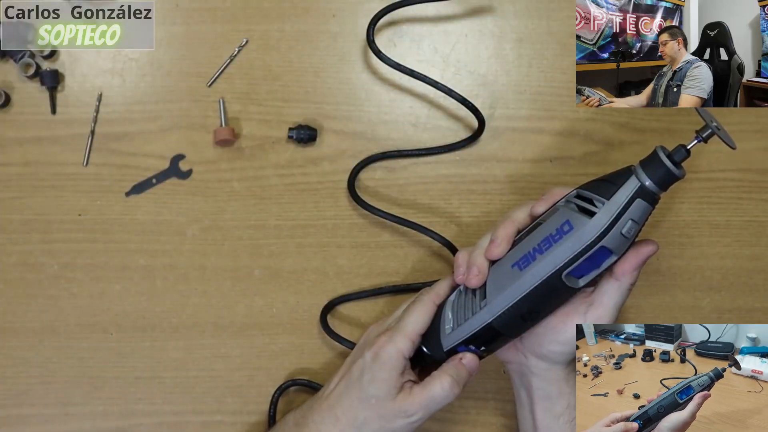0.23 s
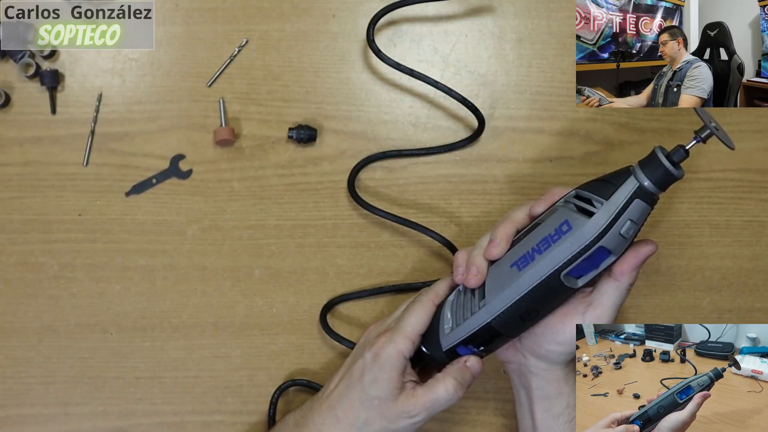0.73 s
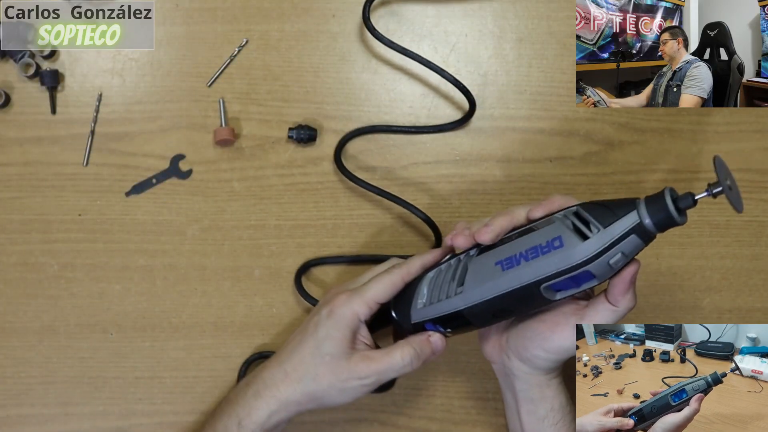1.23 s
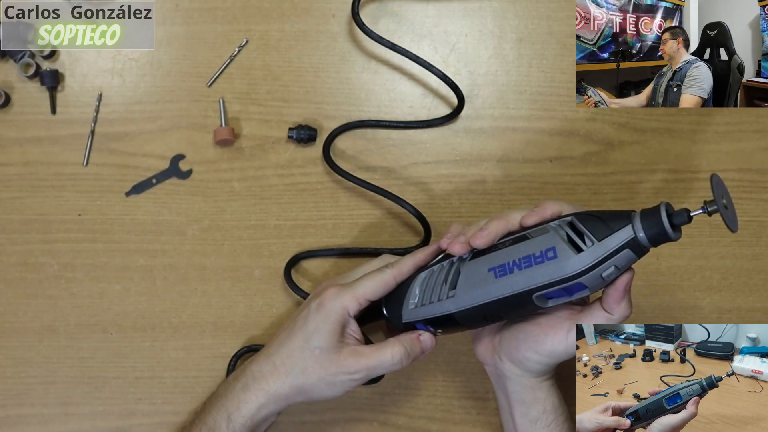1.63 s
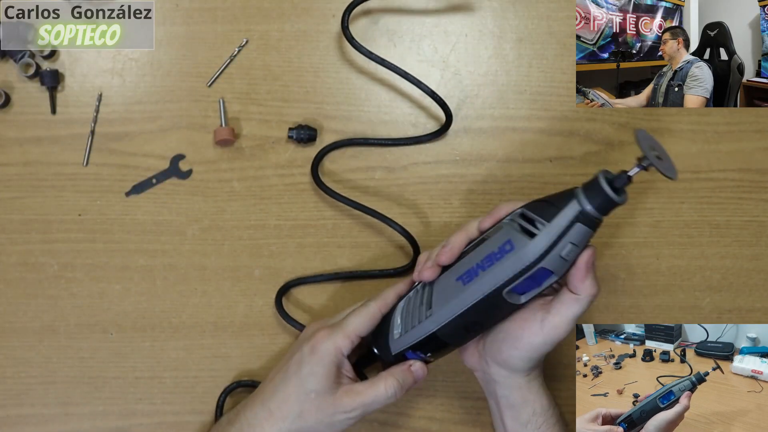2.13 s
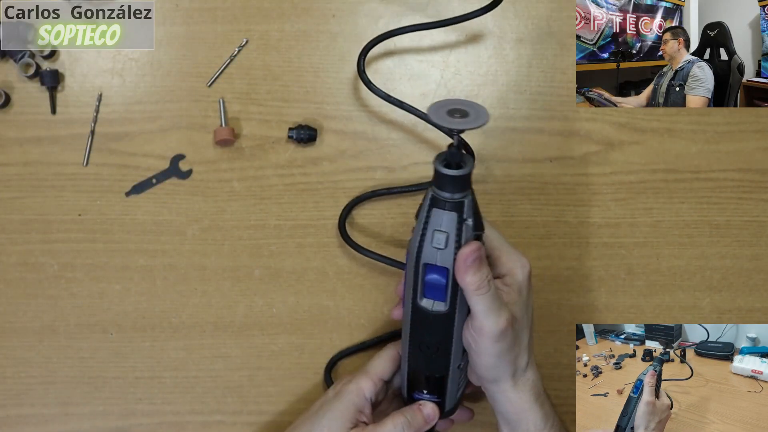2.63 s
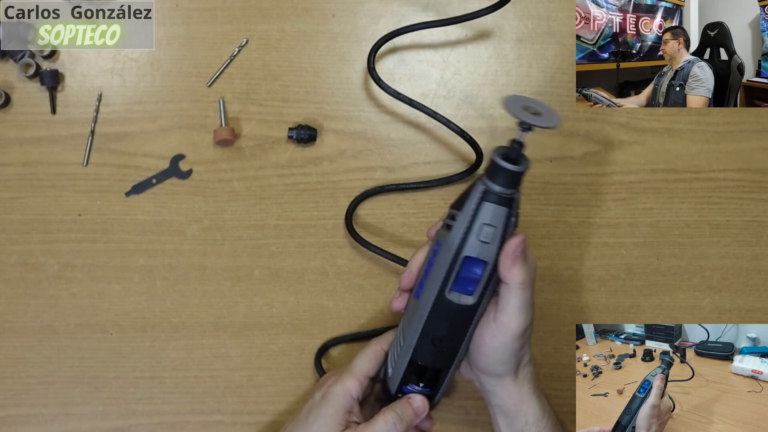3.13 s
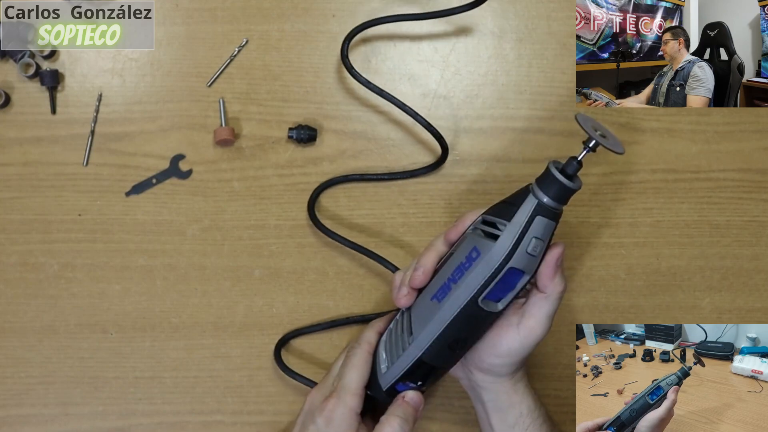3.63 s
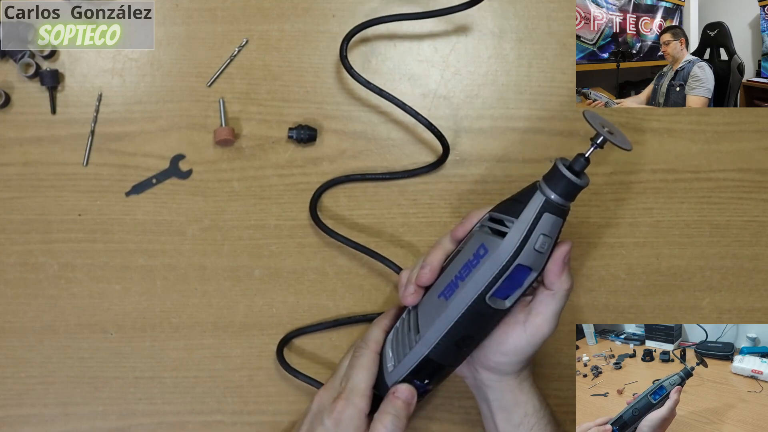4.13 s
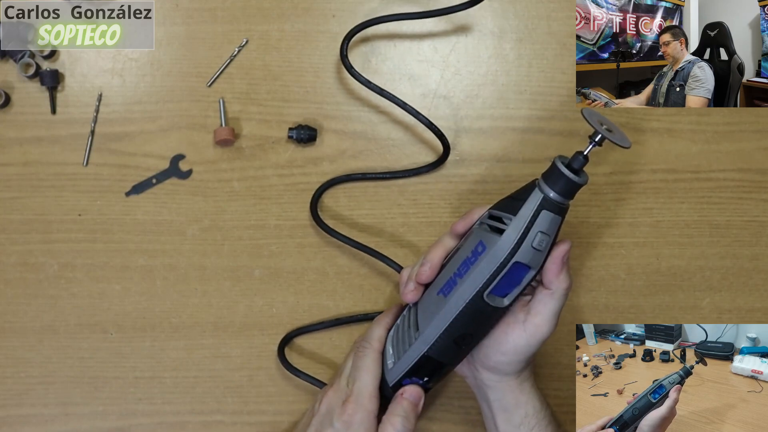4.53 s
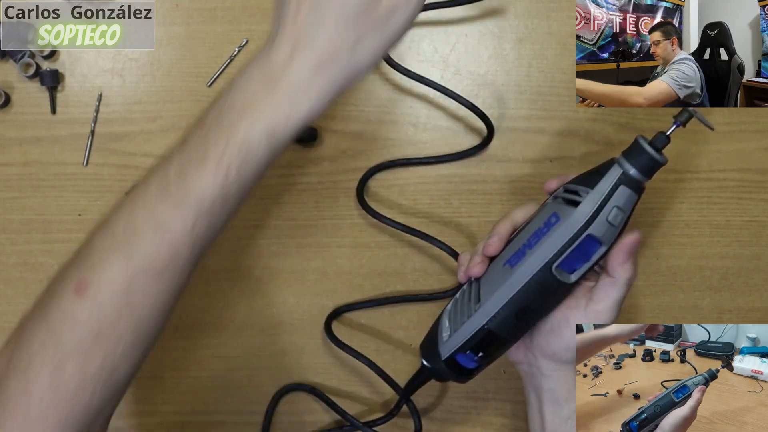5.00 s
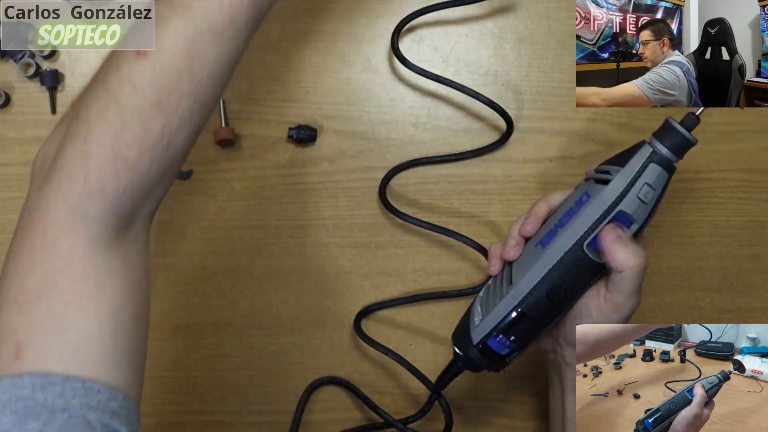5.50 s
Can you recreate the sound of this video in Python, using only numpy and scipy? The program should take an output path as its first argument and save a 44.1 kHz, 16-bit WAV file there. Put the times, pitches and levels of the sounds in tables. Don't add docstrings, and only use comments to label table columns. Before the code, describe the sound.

Buzzy electric whine and fan hiss of a handheld rotary tool, slowing after switch-off, with desk rubbing, a dull thump and a loud click.

```python
import sys
import numpy as np
from scipy import signal
from scipy.io import wavfile
from scipy.ndimage import uniform_filter1d

SR = 44100
rng = np.random.default_rng(int(sys.argv[2]) if len(sys.argv) > 2 else 0)


def decibels_to_gain(level_db):
    exponent = np.asarray(level_db, float) / 20
    return 10 ** exponent


def bounce(signal):
    frames = np.transpose(np.atleast_2d(signal))
    limited = np.clip(frames, -1, 1)
    pcm = np.round(limited * 32767).astype(np.int16)
    wavfile.write(sys.argv[1], SR, pcm)


N = 254016
T = np.arange(N) / SR
SLOW = T[::64]
OFF_S, SNAP_S = 3.8, 5.5946
FULL_HZ = 320
SURGES = 120 * T + 0.13

# (time [s], speed [Hz])
SHAFT_SPEED = [(0.0, 209.6), (0.05, 243.2), (0.1, 285.3), (0.15, 306.4), (0.27, 293.0), (0.48, 293.7),
               (0.6, 305.2), (0.76, 321.4), (1.5, 320.1), (2.5, 321.2), (3.15, 321.0), (3.25, 318.9),
               (3.5, 319.7), (3.78, 317.3)]
# (time [s], level [dB], side line tilt [dB per step])
SLOT_WHINE = [(0.0, -42, 5), (0.13, -20.5, 1), (0.19, -29, 0.5), (0.8, -23.5, 0.5), (0.92, -26, -2.5),
              (1.15, -21.5, 1.5), (1.37, -16, 2.5), (1.83, -16, 0.1), (1.95, -20.5, 1), (2.48, -21, 2),
              (2.77, -18, -0.8), (3.79, -19.5, 0.6), (3.84, -26, 1)]
SLOT_SIDE_LINES = [-4, -4.5, 0, -1.5, -13, -12, -18, -27]
WOBBLE_SIDE_LINES = [-37.5, -53]
DOUBLE_SIDE_LINES = [-53, -46.5, -38.5, -47, -55.5]
SHAFT_MULTIPLES = [3, 5.08, 6, 7.14, 8, 9.12, 11.14, 13.16, 15.15, 16, 21.3, 24, 26, 32, 40, 48, 56, 11.06,
                   11.22]
# (level driven [dB], level coasting [dB])
MULTIPLE_LEVELS = [(-46, -60), (-38, -45), (-42, -60), (-48, -47), (-60, -52), (-41, -34), (-50, -48),
                   (-54, -43), (-49, -50), (-60, -42), (-58, -53), (-50, -40.5), (-49, -53), (-58, -47),
                   (-60, -50), (-62, -50), (-70, -53), (-61, -60), (-57, -60)]
# (frequency [Hz], gain [dB])
HOUSING_GAIN = [(500, -1), (800, 9.5), (1050, -4), (1400, -13), (1760, -16), (2000, -2.5), (2300, 4.5),
                (2800, -0.5), (3300, 2.5), (3580, -1.5), (3950, 7), (4600, 0.5), (6500, -4.5), (12000, -37)]
# (frequency [Hz], width [Hz], gain [dB])
THIN_PANELS = [(1490, 110, 8), (2290, 170, 5), (4150, 190, -12)]
# (time [s], gain [dB])
TONE_GLINT = [(3.8, 5.5), (3.95, -8.5), (4.12, -4), (4.55, -2.5), (4.72, -2), (4.95, -8), (5.15, 3),
              (5.3, -7), (5.6, -10)]
# (time [s], length [s], gain [dB])
VENT_TURNS = [
    (1.28, 0.12, 1.5),
    (1.986, 0.38, -1),
    (3.56, 0.61, 0.5),
]
# (time [s], length [s], ringing [Hz], level [dB])
COLLET_KNOCKS = [
    (5.096, 0.056, 3850, -40),
    (5.153, 0.013, 2680, -30),
    (5.23, 0.034, 2700, -34.5),
    (5.35, 0.014, 2450, -34),
    (5.432, 0.028, 2520, -35),
    (5.47, .04, 3080, -40),
]
# (frequency [Hz], level [dB per Hz])
AIR_COLOUR = [(40, -37), (85, -39), (250, -22.5), (380, -15.5), (520, -7.5), (950, -1.5), (1300, -9),
              (1700, -13.5), (2250, -3), (3100, -10.5), (4900, -15.5), (6000, -22), (9000, -35.5),
              (15500, -53.5)]
# (frequency [Hz], width [Hz], level [dB])
VENT_NOTES = [(812, 17, 0), (973, 21, 3), (1105, 26, -1), (1222, 23.4, 8), (2240, 120, -3),
              (2550, 200, -23)]
# (frequency [Hz], level [dB])
HUM_TONES = [(120, -62), (360, -58)]
# (time [s], level [dB])
ARM_RUB = [
    (4.76, -46),
    (4.834, -47.5),
    (4.96, -49.5),
    (5.002, -44.5),
    (5.338, -51),
    (5.76, -48.5),
]
# (frequency [Hz], level [dB per Hz])
ARM_COLOUR = [(15, -53), (25, -29), (64, -12), (189, -4), (325, -2.5), (362, 0), (485, -1), (600, -8.5),
              (780, -56), (1320, -120)]
# (time [s], peak [dB], frequency [Hz], time to fall 60 dB [s])
DESK_BUMPS = [
    (4.798, -37, 280, 0.16),
    (4.952, -15.5, 113, 0.048),
    (5.051, -36, 150, 0.072),
    (5.089, -37, 80.4, .1),
    (5.235, -32, 198, 0.044),
    (5.57, -34, 100, 0.075),
    (5.63, -31, 173, 0.063),
]
# (frequency [Hz], level [dB], time to fall 60 dB [s])
CATCH_RINGS = [(980, -3.5, 0.015), (1940, 1, 0.019), (2620, -16, 0.03), (3620, -11, 0.01),
               (4540, -4.5, 0.016), (5880, -6, 0.0063), (7000, -4, 0.0081), (8100, -47, 0.0047),
               (11500, -24, 0.0037)]
# (frequency [Hz], time to fall 60 dB [s])
ROOM_DECAY = [(300, 0.43), (1500, 0.26), (4000, 0.2), (10000, 0.13)]
# (time [s], length [s], edge [Hz], depth [dB])
TREBLE_GAPS = [(.078, .012, 7500, 15), (.377, .013, 8000, 12), (.61, .014, 6000, 16),
               (1.101, .013, 6000, 16), (1.286, .024, 6500, 45), (1.357, .012, 6500, 15),
               (2.381, .012, 7500, 16), (3.15, .011, 8000, 16), (3.832, .012, 8500, 13),
               (4.023, .012, 6000, 14), (4.729, .016, 5500, 15), (4.813, .012, 6500, 10),
               (4.981, .011, 6500, 28), (5.646, .014, 9000, 9)]


def evened(x):
    return x / np.sqrt(np.mean(x ** 2) + 1e-20)


def read(points, hz):
    f, value = np.transpose(points)
    return np.interp(np.log(hz + 1), np.log(f + 1), value)


def curve(rows, column=1):
    rows = np.array(rows)
    return np.interp(SLOW, rows[:, 0], rows[:, column])


def fine(control):
    return np.interp(T, SLOW, control)


def bell(t, centre, length):
    return np.exp(-((t - centre) / length) ** 2)


def tone(turns):
    return np.sqrt(2) * np.cos(2 * np.pi * turns)


def drift(top_hz, count):
    hz = np.geomspace(top_hz / 20, top_hz, 12)[:, None]
    curves = []
    for _ in range(count):
        waves = np.sin(2 * np.pi * (hz * SLOW + rng.random(hz.shape)))
        curves.append(evened((waves / hz ** 0.25).sum(0)))
    return curves


def noise(colour_db, patchy_db, size=1024):
    a, b, patches = rng.standard_normal(colour_db.T.shape + (3,)).T
    patches = evened(uniform_filter1d(uniform_filter1d(patches, 8, 0), 8, 1))
    z = (a + 1j * b) * decibels_to_gain(colour_db + patchy_db * patches)
    return signal.istft(z, nperseg=size, noverlap=size * 3 // 4)[1][:N]


def band_noise(low_hz, high_hz, length):
    band = signal.butter(2, [low_hz, high_hz], "bandpass", fs=SR)
    return signal.lfilter(*band, rng.standard_normal(length))


def shaft():
    off_hz, brake_hz_per_s, creep_hz, ease_hz = 312.6, 200.5, 66.5, 84.6
    ahead = (off_hz - creep_hz - brake_hz_per_s * (SLOW - OFF_S)) / ease_hz
    coasting = creep_hz + ease_hz * np.logaddexp(0, ahead)
    return uniform_filter1d(np.minimum(curve(SHAFT_SPEED), coasting), size=30)


def facing(t):
    return sum(db * bell(t, s, length) for s, length, db in VENT_TURNS)


def housing(hz):
    panels = sum(db * bell(hz, f, width) for f, width, db in THIN_PANELS)
    return read(HOUSING_GAIN, hz) + panels


def room(x):
    taps = np.zeros(SR // 2)
    at = np.arange(180, SR // 2 - 20, 20)
    taps[at + rng.integers(0, 20, at.shape)] = rng.choice([-1., 1.], at.shape)
    hz, t, z = signal.stft(taps, SR, nperseg=128)
    decay = decibels_to_gain(-60 * t / read(ROOM_DECAY, hz)[:, None])
    tail = signal.istft(z * decay, SR, nperseg=128)[1]
    return signal.fftconvolve(x, tail / np.linalg.norm(tail))[:len(x)]


def hum():
    return sum(decibels_to_gain(db) * np.sqrt(2) * np.sin(2 * np.pi * hz * T) for hz, db in HUM_TONES)


def swish():
    start_s, length_s, level_db, linger = 5.08, 0.21, -57.5, 0.3
    shape = np.maximum(bell(T, start_s, length_s), linger * (T > start_s))
    return decibels_to_gain(level_db) * shape * evened(band_noise(6500, 12000, N))


def arm():
    hz = np.fft.rfftfreq(1024, 1 / SR)[:, None]
    colour_db = read(ARM_COLOUR, hz) - 60 * (hz > 700) + np.zeros(N // 256 + 5)
    fade_in = np.clip((T - ARM_RUB[0][0]) / 0.039, 0, 1)
    out = evened(noise(colour_db, 1.4)) * fine(decibels_to_gain(curve(ARM_RUB) + 7.0)) * fade_in
    for s, db, f, t60 in DESK_BUMPS:
        u = np.maximum(T - s, 0)
        soft_start = 1 - np.exp(-u / 0.0014)
        out += decibels_to_gain(db - 60 * u / t60) * soft_start * np.sin(2 * np.pi * f * u) * 1.4
    return signal.lfilter(*signal.butter(2, 50, "highpass", fs=SR), out)


def snap():
    level_db, crack_db = -2.5, 3
    u = T[T >= SNAP_S] - SNAP_S
    ring = sum(decibels_to_gain(db - 60 * u / t60) * np.sin(2 * np.pi * hz * u) for hz, db, t60 in CATCH_RINGS)
    grit = band_noise(900, 6500, SR)[:len(u)]
    crack = decibels_to_gain(crack_db - 60 * u / 0.015) * grit
    near = decibels_to_gain(level_db) * (1 - np.exp(-u / 0.00041)) * (ring + crack)
    far = (0.35 * near + grit) * decibels_to_gain(-60 * u / 0.0093)
    return np.pad(near + decibels_to_gain(-4.5) * room(far), (N - len(u), 0))


def air():
    hz = np.fft.rfftfreq(1024, 1 / SR)[:, None]
    t = np.arange(N // 256 + 5) * 256 / SR
    vents = sum(decibels_to_gain(db) ** 2 / (1 + (2 * (hz - f) / w) ** 2) for f, w, db in VENT_NOTES)
    colour_db = read(AIR_COLOUR, hz) + 10 * np.log10(1 + 2.5 * vents)
    high = 1 / (1 + (3000 / (hz + 1)) ** 4)
    octaves = np.log2(shaft() / FULL_HZ)
    stop_db = -27 * np.maximum(t - SNAP_S, 0)
    turn_db = facing(t)
    late = np.where(t < OFF_S, t, np.maximum(t - 0.05, OFF_S))
    roar_db = -32 + 7.5 * np.interp(late, SLOW, octaves) + stop_db + turn_db
    fan_db = -34.5 + np.interp(t, SLOW, 13.5 * octaves + 0.078 * (curve(SLOT_WHINE) + 20))
    bearing_db = -44
    hiss_db = 10 * np.log10(decibels_to_gain(fan_db) ** 2 + decibels_to_gain(bearing_db) ** 2) + 0.4 * stop_db + turn_db
    wind = noise(colour_db + (1 - high) * roar_db + high * (hiss_db + 7.0), 0.86)
    throb = 0.022 * (T < OFF_S) * np.cos(2 * np.pi * (SURGES - 0.05))
    return decibels_to_gain(-25.5) * evened(wind) * (1 + throb)


def knocks(turns, speed):
    pulse = np.exp(2.0 * (np.cos(2 * np.pi * turns) - 1))
    out = 0
    for s, length, hz, db in COLLET_KNOCKS:
        multiple = np.round(hz / np.interp(s, SLOW, speed))
        out += decibels_to_gain(db + 10.0) * bell(T, s, length) * pulse * np.cos(2 * np.pi * multiple * turns)
    return out


def disc_wobble(turns, speed, live):
    grip_s = 1.68
    db = -31 + 35 * np.log2(speed / FULL_HZ) - 2.5 * np.clip(SLOW - grip_s, 0, OFF_S - grip_s)
    db += -12 * bell(SLOW, 3.83, 0.038) + 2.5 * (1 - live)
    db -= 15.0 * np.exp(-SLOW / 0.052)
    return fine(decibels_to_gain(db)) * tone(turns)


def split(turns, multiple, first, side_lines, wander_db, base_db=0, tilt_db=0):
    out = 0
    wanders = drift(6.0, count=len(side_lines))
    for (step, db), wander in zip(enumerate(side_lines, first), wanders):
        level_db = base_db + db + tilt_db * step + wander_db * wander
        out += fine(decibels_to_gain(level_db)) * tone(multiple * turns + step * SURGES)
    return out


def current_whine(turns, speed, kick_db):
    out = split(turns, 8, -2, SLOT_SIDE_LINES, 1.47, curve(SLOT_WHINE) - 4.5, curve(SLOT_WHINE, column=2))
    out += split(turns, 1, 1, WOBBLE_SIDE_LINES, 0.23, -12.0 * np.exp(-SLOW / 0.12))
    double_db = housing(16 * speed) + kick_db - 1.44 * SLOW + 1.0
    return out + split(turns, 16, -2, DOUBLE_SIDE_LINES, 2.2, double_db)


def shaft_tones(turns, speed, live, kick_db):
    sway = fine(0.55 * np.clip((135 - speed) / 25, 0, 1)) * np.sin(2 * np.pi * turns)
    slowing = np.log10(speed / 200)
    cap_db = live * (12 - 6 * np.clip((SLOW - 1.5) / 0.14, 0, 1))
    wanders = drift(25.0, count=len(SHAFT_MULTIPLES))
    out = 0
    for k, (driven_db, coast_db), wander in zip(SHAFT_MULTIPLES, MULTIPLE_LEVELS, wanders):
        flutter_db = (3.2 - 1.03 * live) * wander + curve(TONE_GLINT) + 2.1 * facing(SLOW)
        if k % 8 == 0:
            flutter_db += 0.5 * kick_db
        if round(k) == 11:
            flutter_db += cap_db * bell(k * speed, 3590, 110)
        slowing_db = (6 if k > 16 else 26) * slowing
        db = live * driven_db + (1 - live) * (coast_db + slowing_db) + housing(k * speed) + flutter_db
        hunting = k / 8 * (k < 40) * sway
        out += fine(decibels_to_gain(db)) * np.sqrt(2) * np.cos(2 * np.pi * (k * turns + rng.random()) + hunting)
    return out


def motor():
    speed = shaft() + 0.2 * drift(8.0, count=1)[0]
    turns = np.cumsum(fine(speed)) / SR
    live = np.clip((OFF_S + 0.096 - SLOW) / 0.1, 0, 1)
    kick_db = 13.5 * np.exp(-SLOW / 0.065)
    out = current_whine(turns, speed, kick_db) * fine(live)
    out += disc_wobble(turns, speed, live)
    out += shaft_tones(turns, speed, live, kick_db)
    return out + knocks(turns, speed)


def scene():
    return (hum() + swish() + arm() + snap() + air() + motor())[None]


def roll_off(x):
    return signal.sosfilt(signal.butter(12, 15600, fs=SR, output="sos"), x)


def record(dry):
    hz, t, z = signal.stft(np.clip(dry, -1, 1), SR, nperseg=256, noverlap=192)
    for s, length, edge_hz, depth_db in TREBLE_GAPS:
        near = abs(t - s) < length
        dip = np.clip(2 - 3 * abs(t[near] - s) / length, 0, 1)
        z[..., near] *= decibels_to_gain(-depth_db * dip * (hz[:, None] > edge_hz))
    z[:, hz > 15700] = 0
    mix = signal.istft(z, SR, nperseg=256, noverlap=192)[1][:, :N]
    return roll_off(mix)


dry = scene()
out = record(dry)
bounce(out)
```